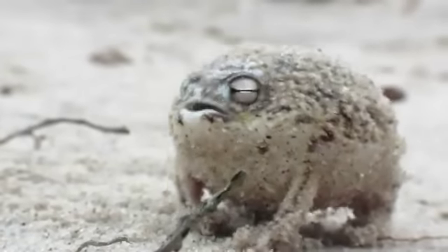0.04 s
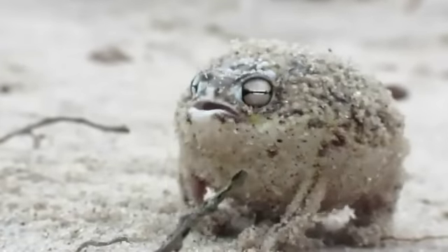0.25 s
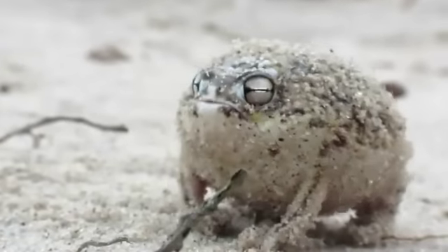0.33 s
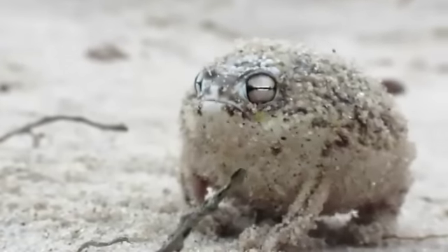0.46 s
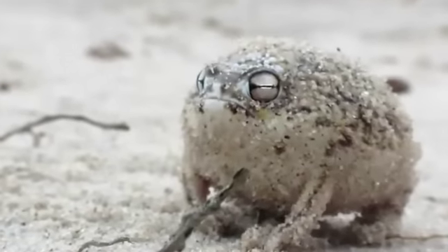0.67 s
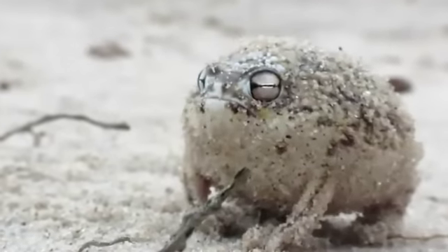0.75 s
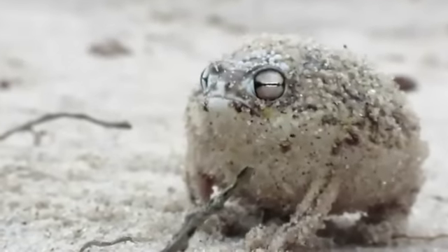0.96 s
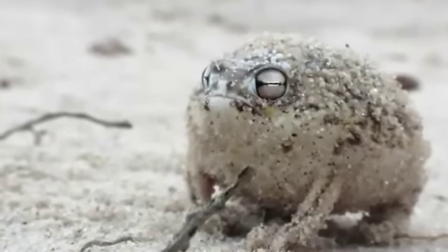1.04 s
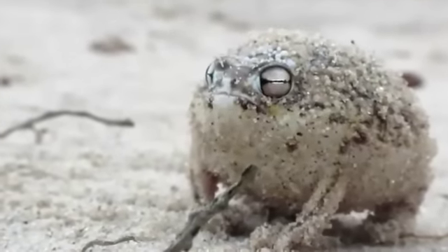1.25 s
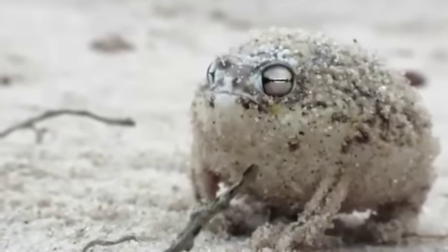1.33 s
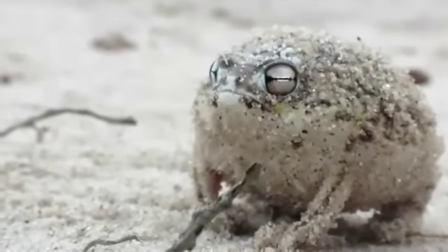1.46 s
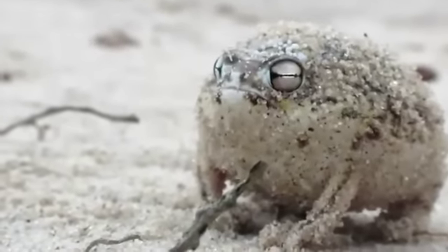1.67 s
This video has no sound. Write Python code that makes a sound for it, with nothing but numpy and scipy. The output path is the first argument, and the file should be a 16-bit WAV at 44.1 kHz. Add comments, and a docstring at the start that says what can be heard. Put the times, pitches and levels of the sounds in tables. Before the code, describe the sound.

A small frog gives one short, high squeak on open sand, with light wind buffeting the microphone

```python
"""Small frog squeaking on sand

A small frog on sand squeaks once, close to a camera's two microphone ports: a clean high pulse train glides
up and down while the mouth opens and shuts, its resonance sweeping over the overtones. The sand and stones
close by scatter its treble. Light wind buffets and thumps the ports, over distant open-air rumble and hiss,
all made of shaped noise and short low swings; late on, something rustles faintly in a band of noise."""
import sys
import numpy as np
from scipy import signal
from scipy.fft import rfft, irfft, next_fast_len
from scipy.io import wavfile
from scipy.ndimage import uniform_filter1d, map_coordinates

SR = 44100
rng = np.random.default_rng(int(sys.argv[2]) if len(sys.argv) > 2 else 0)


def unload_wav(signal):
    """Save mono or channel-first audio to the path in sys.argv[1] as 16-bit WAV at rate SR, clipped to [-1, 1]."""
    wavfile.write(
        sys.argv[1],
        SR,
        np.round(np.clip(np.atleast_2d(signal).T, -1, 1) * 32767).astype(np.int16),
    )


def gain_from_decibels(decibels):
    """Convert decibel values to linear amplitude factors."""
    exponent = np.asarray(decibels, float) / 20
    return 10 ** exponent


N = 74970  # samples, 1.7 s


def unit(x):
    """Scale to rms 1."""
    return x / np.sqrt(np.mean(x ** 2) + 1e-20)


def along(points, hz):
    """Columns of (frequency [Hz], ..) rows read on a log frequency axis."""
    f, *columns = np.transpose(points)
    return [np.interp(np.log(hz + 1), np.log(f + 1), column) for column in columns]


def curves(rows):
    """One value per sample for each column after the time."""
    s, *columns = np.transpose(rows)
    return [np.interp(np.arange(N) / SR, s, column) for column in columns]


def wobble(rate):
    """A smooth random curve, rate knots a second (at most SR / 10)."""
    knots = rng.standard_normal(N // 8)
    return map_coordinates(knots, [np.arange(N) * min(rate / SR, .1)])


def filtered(x, response):
    """x with its spectrum times a response of frequency."""
    m = next_fast_len(N + SR // 4)
    hz = np.fft.rfftfreq(m, 1 / SR)
    return irfft(rfft(x, m) * response(hz), m)[..., :N]


def rush(spectrum, alike, patchy_db):
    """Stereo noise of rms 1 in patches of random gain; mid and side are mixed for the likeness of the ports."""
    z = signal.stft(rng.standard_normal((2, N)), nperseg=512)[2]
    field = uniform_filter1d(rng.standard_normal(z.shape[1:]), size=6, axis=0)
    field = uniform_filter1d(field, size=14, axis=1)
    pair = signal.istft(z * gain_from_decibels(patchy_db * unit(field)), nperseg=512)[1][:, :N]

    def mid_side_gains(hz):
        angle = np.arccos(np.clip(along(alike, hz)[0], -1, 1)) / 2
        return gain_from_decibels(along(spectrum, hz)[0]) * [np.cos(angle), np.sin(angle)]

    mid, side = filtered(pair, mid_side_gains)
    return unit(np.array([mid + side, mid - side]))


# distant open air, from the third row up: (frequency [Hz], relative level [dB per Hz])
AIR_SPECTRUM = [(71, -30), (120, -1.5), (157, -6.5), (289, -7.5), (617, -18), (1070, -20.5), (1160, -25),
                (1260, -24), (2750, -35.5), (5990, -39.5), (16000, -50.5)]
# how alike the air is at both ports: (frequency [Hz], left-right likeness [-1 to 1])
AIR_LIKENESS = [(150, 0.97), (290, .75), (640, 0.17), (1400, 0.077), (3100, .15), (15000, 0.008)]


def distant_air():
    """Far-off rumble and hiss: steady noise, alike at both ports only in the bass."""
    low_end = [(15, -30), (30, -13.5), (120, -10)]  # (frequency [Hz], relative level [dB per Hz])
    level_db = -47 + 0.45 * wobble(4)
    return gain_from_decibels(level_db) * rush(low_end + list(AIR_SPECTRUM)[2:], AIR_LIKENESS, patchy_db=1)


# the rustle's swell, before a slight flutter: (time [s], level [dB])
RUSTLE_LEVEL = [(1.3, -100), (1.345, -75), (1.37, -66), (1.45, -63.5), (1.53, -64), (1.6, -71),
                (1.7, -67.5)]
# its colour: (frequency [Hz], relative level [dB per Hz])
RUSTLE_COLOUR = [(1200, -59.5), (1800, -5), (3200, 1.5), (3800, -3.5), (4500, 3.5), (5000, -4), (5500, 2),
                 (5800, -0.5), (6050, -27.5), (7000, -80)]


def rustle():
    """A faint late rustle: fluttering band of noise, much alike at both ports."""
    level_db = curves(RUSTLE_LEVEL)[0] + wobble(40)
    return gain_from_decibels(level_db) * rush(RUSTLE_COLOUR, [(3000, 0.81)], patchy_db=1.5)


# rise and fall of the wind: (time [s], strength 10 dB below the buffeting at each port [dB])
WIND_STRENGTH = [(0.0, -55), (0.142, -59), (0.416, -61.5), (0.572, -50), (0.738, -47.5), (0.828, -50.5),
                 (0.96, -48), (1.102, -47), (1.23, -56), (1.576, -53), (1.7, -51)]
# spectrum of the buffeting: (frequency [Hz], relative level [dB per Hz])
BUFFET_SPECTRUM = [(15, -0.5), (30, -0.5), (70, 5.5), (110, -2.5), (160, -18), (250, -28.5), (400, -72)]


def buffeting():
    """Wind turbulence at the ports: lumpy low noise, practically unrelated left and right."""
    lumps_db = 2.5 * np.array([wobble(24), wobble(17)])
    level_db = curves(WIND_STRENGTH)[0] + 10 + lumps_db
    return gain_from_decibels(level_db) * rush(BUFFET_SPECTRUM, [(30, 0.0046)], patchy_db=2)


# single pushes of wind: (time [s], level of the main swing [dB], its frequency [Hz], port hit [0 left, 1 right])
WIND_THUMPS = [(0.488, -29.5, 70, 1), (0.644, -33, 70, 0), (.7, -29.5, 55.1, 1), (0.75, -23.5, 90, 1),
               (.871, -21.5, 70, 0), (0.901, -27, 59.4, 0), (1.082, -24.5, 80.5, 0),
               (1.096, -19.5, 88.7, 0), (1.112, -23, 65.6, 0), (1.302, -16, 85, 0), (1.321, -17.5, 69.2, 0),
               (1.338, -23, 70.2, 0), (1.358, -31, 70, 0)]


def thumps():
    """Pushes of air on one port: a brief low swing under a bell envelope, with an overtone at 2.5 times."""
    width_cycles, overtone_share = .55, 0.28
    t = np.arange(N) / SR
    ports = np.zeros((2, N))
    for s, db, hz, port in WIND_THUMPS:
        cycles = (t - s) * hz
        envelope = gain_from_decibels(db) * np.exp(-(cycles / width_cycles) ** 2)
        swing = np.sin(2 * np.pi * cycles + rng.uniform(-0.6, .5))
        ports[int(port > .5)] += envelope * (swing + overtone_share * np.sin(5 * np.pi * cycles))
    return ports


def wind():
    """Buffeting and thumps; the stereo widening subtracts a share of each port from the other."""
    ports = buffeting() + thumps()
    return ports - .55 * ports[::-1]


def ground_scatter(x):
    """Sand and stones close by throw back the treble as a short decaying tail, different at each port."""
    level_db, t60_s, from_hz = -18, .035, 4500
    t = np.arange(SR // 20) / SR
    tail = rng.standard_normal((2, len(t))) * gain_from_decibels(-60 * t / t60_s) * (t > .001)
    wet = signal.fftconvolve(x, tail / np.linalg.norm(tail[0]), axes=1)[:, :N]
    return gain_from_decibels(level_db) * filtered(wet, lambda hz: 1 / (1 + (from_hz / (hz + 1)) ** 4))


# glide of the vocal pulses, before smoothing and jitter: (time [s], pitch [Hz])
VOCAL_PITCH = [(.228, 1420), (.232, 1215), (.236, 1105), (.241, 1053), (.248, 1039), (.26, 1058),
               (.28, 1108), (.295, 1127), (.307, 1128), (.32, 1116), (.335, 1088), (.355, 1019), (.38, 900),
               (.405, 821), (.425, 747), (.44, 722), (.45, 720), (.46, 779), (.47, 843), (.486, 828),
               (.489, 1290), (.51, 1300)]


def vocal_pitch():
    """Pulse rate of the voice in Hz, its corners rounded over 2 ms, with a slight jitter."""
    glide = uniform_filter1d(curves(VOCAL_PITCH)[0], size=90)
    return glide * (1 + .0015 * wobble(300))


# the call: (time [s], effort [dB], mouth resonance [Hz], its boost [dB], level of the treble above it [dB])
SQUEAK = [(.224, -130, 6500, 13, -11.5), (.2272, -59.5, 6555, 4, -10), (.229, -35.5, 6500, 12.5, -10),
          (.231, -30.5, 6420, 12.5, -8), (.237, -32.5, 6500, 18, -5.5), (.241, -32.5, 7000, 17.5, -2.5),
          (.247, -31.5, 7350, 17.5, -5.5), (.28, -34, 8010, 21.5, -0.5), (.32, -33.5, 7500, 19.5, 2.5),
          (.35, -37.5, 7510, 23, -1), (.39, -37.5, 6830, 18, -5), (.42, -37, 6130, 11.5, -8.5),
          (.44, -37, 5800, 12, -13), (.45, -40, 5630, 18.5, -10), (.459, -40, 5280, 17, -14),
          (.467, -35.5, 4850, 11.5, -19), (.472, -38, 3490, 8, -20.5), (.478, -37.5, 3320, 0.5, -25.5),
          (.485, -38.5, 3280, 2.5, -29), (.489, -41, 2534, 7, -26.5), (.499, -43, 2715, 3.5, -39),
          (.505, -62, 2660, 13, -24), (.514, -64.5, 2720, 0, -29.5), (.522, -130, 2700, 3, -24)]
# hoarseness, before it grows with frequency: (time [s], share of noise [0-1])
HOARSENESS = [(.229, .15), (.236, .04), (.27, .018), (.32, .012), (.35, .05), (.4, .08), (.445, .07),
              (.465, .04), (.485, .05), (.49, .65), (.5, .9)]
# fixed colour of throat and body: (frequency [Hz], gain [dB])
BODY_COLOUR = [(700, -17), (1050, -7), (1500, -2), (2300, -1), (3300, 1), (3850, 0), (4200, -10),
               (4550, -18), (5000, 2), (5600, 6), (7500, 2), (9500, -3), (12000, -3), (15500, -4)]
# the two ports hear the frog differently: (frequency [Hz], left over right [dB], left leads by [rad])
PORT_DIFFERENCE = [(780.5, -1, -1.6), (1300, -.6, 0.075), (2017, 2.5, 0.24), (2366, -7.5, -0.76),
                   (2800, 1.8, -1.1), (3600, 3, 0.96), (4060, 13, .5), (4720, 8.5, -2), (4444, -17.5, 0.82),
                   (5600, -3, -0.034), (6865, 2, 1), (7100, 3, -.6), (7600, -.5, -.4), (8020, -5, -0.77),
                   (8400, -1.5, -0.98), (9500, -9.5, 0.97), (10100, 5.5, 1), (11190, -4, 0.94),
                   (12200, 2, 0)]


def frog():
    """Overtones of one pulse train, weighted by body, moving mouth and port; hoarseness smears them into noise."""
    mouth_q, open_hz, sharpens = 8.9, 7500, 1.3  # the resonance sharpens as the mouth closes and it falls
    skirt, treble_from = 1.105, 1.3  # steepness; treble edge as a multiple of the resonance
    shimmer_db, shimmer_rate = 1.3, 110  # rate in knots a second
    rough_from_hz, rough_grows = 3900, 1.2  # high overtones smear more
    rasp_db, rasp_rate = -2.5, 700  # rasp passes the body uncoloured; rate in knots a second
    top_hz = 15780

    pitch = vocal_pitch()
    effort_db, mouth, boost_db, treble_db = curves(SQUEAK)
    rough, = curves(HOARSENESS)
    phase = 2 * np.pi * np.cumsum(pitch) / SR
    width = mouth / mouth_q * np.clip(mouth / open_hz, .6, 1) ** sharpens  # Hz
    side = np.array([[.5], [-.5]])  # half of each port difference to the left, half to the right
    voice = np.zeros((2, N))
    for k in range(1, 23):
        f = k * pitch
        resonance = 1j * f * width / (mouth ** 2 - f ** 2 + 1j * f * width)
        ring = gain_from_decibels(boost_db) * resonance ** skirt
        above = gain_from_decibels(treble_db / (1 + (treble_from * mouth / f) ** 8))
        body_db = along(BODY_COLOUR, f)[0] + shimmer_db * wobble(shimmer_rate)
        gain = gain_from_decibels(body_db) * (above + ring)

        share = np.clip(rough * (1 + (f / rough_from_hz) ** rough_grows), 0, 1)
        noise = share * np.sqrt(.5) * (wobble(rasp_rate) + 1j * wobble(rasp_rate))
        rasp = gain_from_decibels(rasp_db) * above * np.clip(f / rough_from_hz, 0, 1)
        colour = gain * np.sqrt(1 - share ** 2) + noise * (gain + rasp)
        overtone = colour * (f < top_hz) * np.exp(1j * k * phase)

        pan_db, lead = along(PORT_DIFFERENCE, f)
        voice += np.real(overtone * gain_from_decibels(side * pan_db) * np.exp(1j * side * lead))
    return voice * np.sqrt(2) * gain_from_decibels(effort_db)


def scene():
    """Distant air, rustle and wind around the close frog and its scatter off the ground."""
    surroundings = distant_air() + rustle() + wind()
    call = frog()
    return surroundings + call + ground_scatter(call)


def roll_off(x):
    """The treble ends steeply here."""
    return signal.sosfilt(signal.butter(12, 16840, fs=SR, output="sos"), x)


def record(dry):
    """Gentle gain control: takes a share off the level, averaged over both ports, above a threshold."""
    threshold_db, share, window_s = -24.5, 0.19, .03
    power = uniform_filter1d(np.mean(dry ** 2, 0), size=round(window_s * SR))
    level_db = 10 * np.log10(np.abs(power) + 1e-12)
    mix = dry * gain_from_decibels(-share * np.maximum(level_db - threshold_db, 0))
    return roll_off(mix)


dry = scene()
out = record(dry)
unload_wav(out)
```